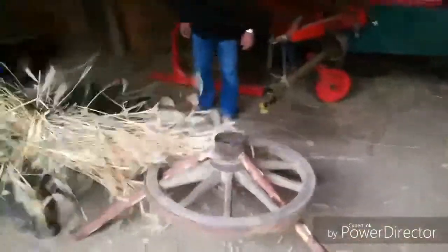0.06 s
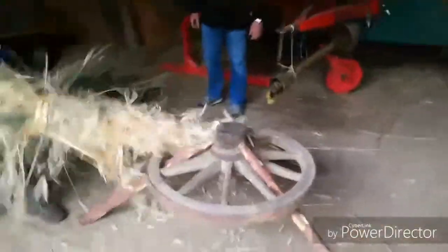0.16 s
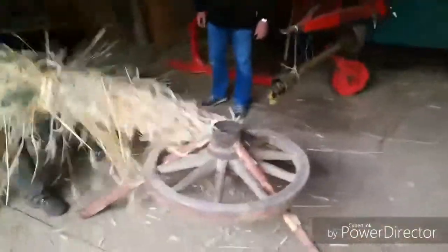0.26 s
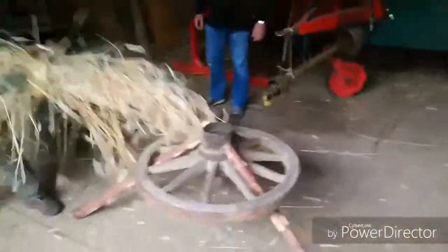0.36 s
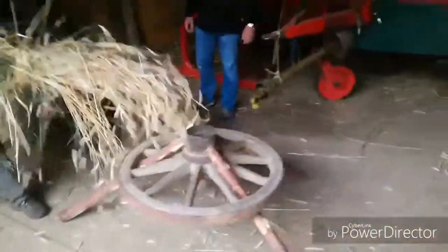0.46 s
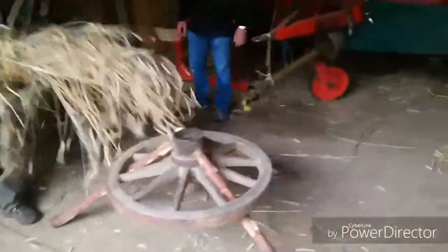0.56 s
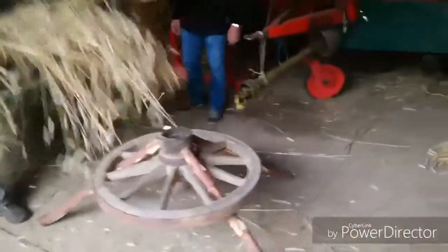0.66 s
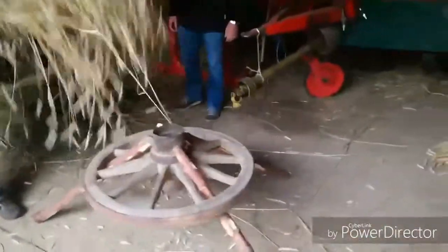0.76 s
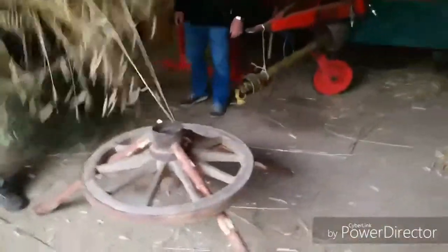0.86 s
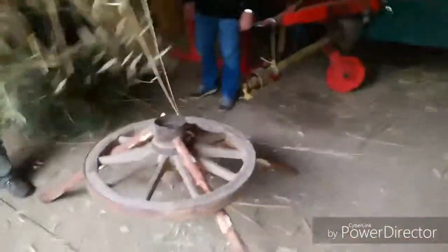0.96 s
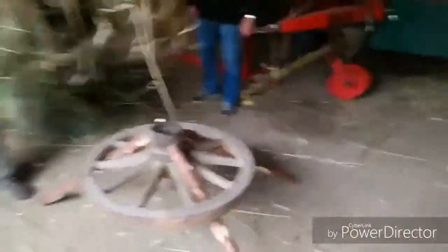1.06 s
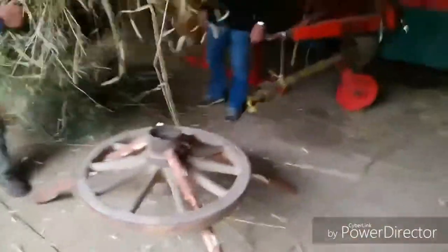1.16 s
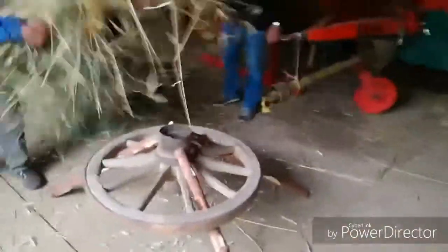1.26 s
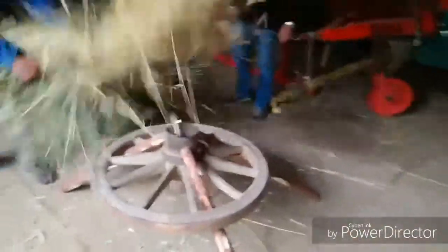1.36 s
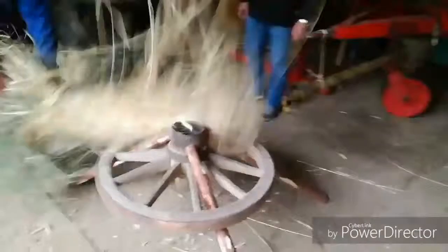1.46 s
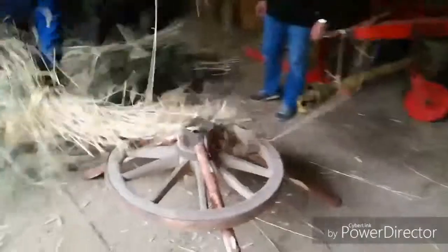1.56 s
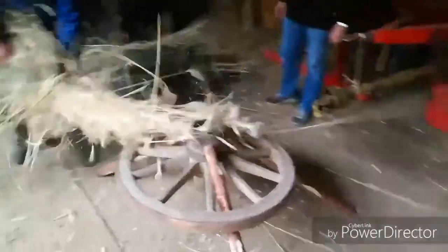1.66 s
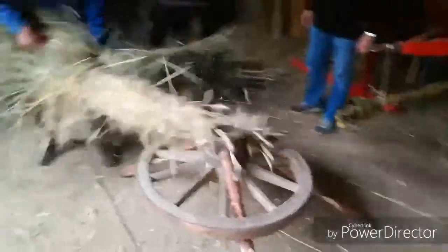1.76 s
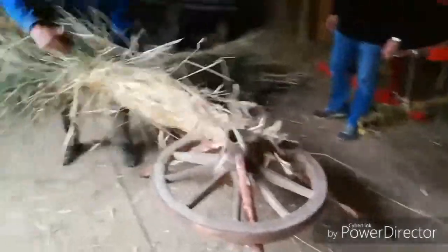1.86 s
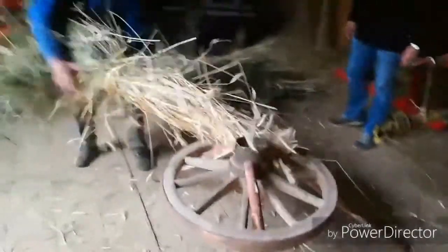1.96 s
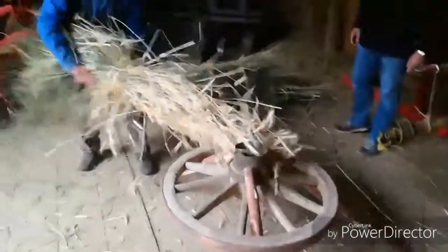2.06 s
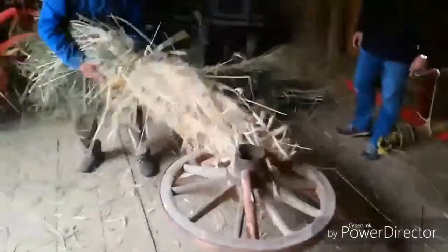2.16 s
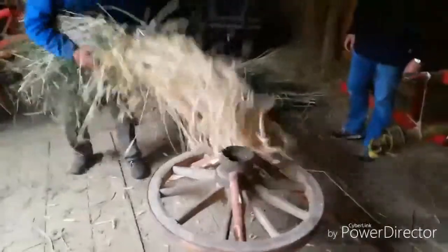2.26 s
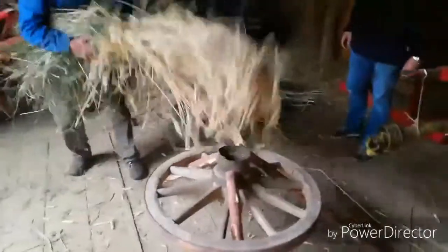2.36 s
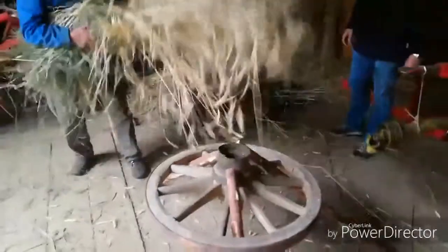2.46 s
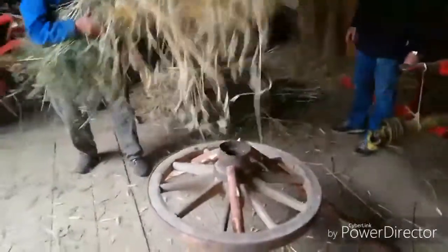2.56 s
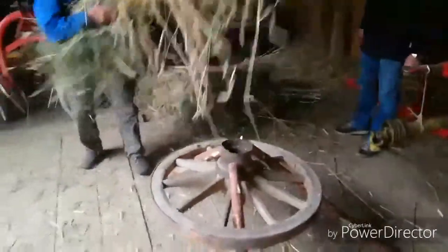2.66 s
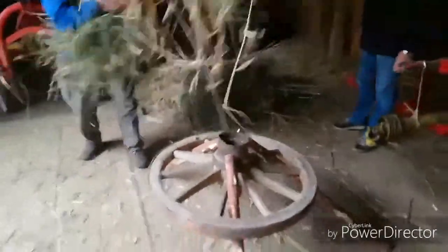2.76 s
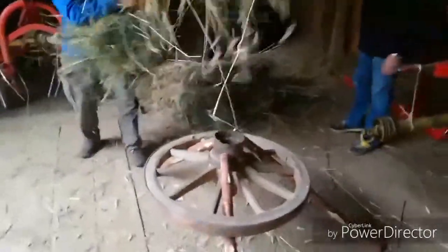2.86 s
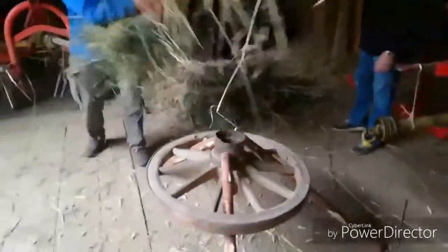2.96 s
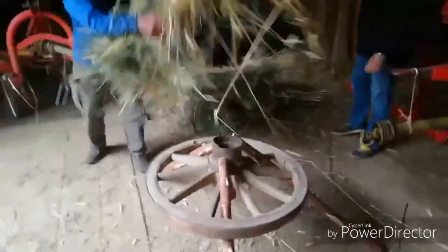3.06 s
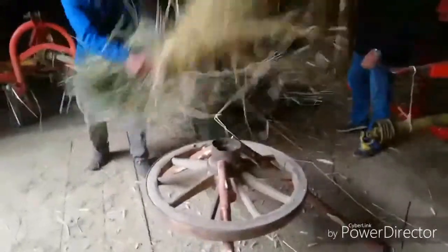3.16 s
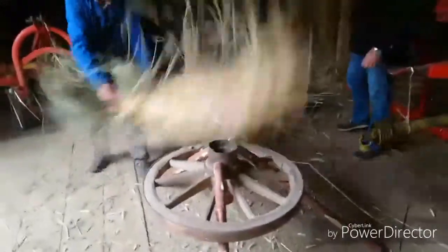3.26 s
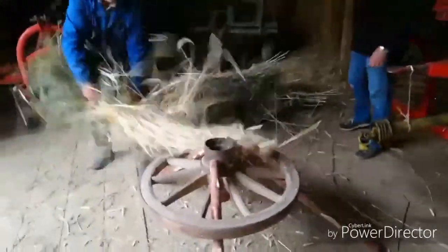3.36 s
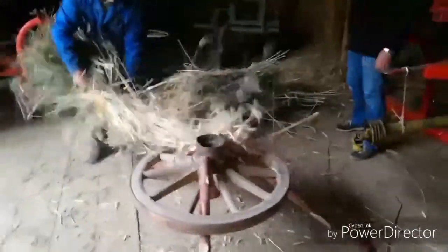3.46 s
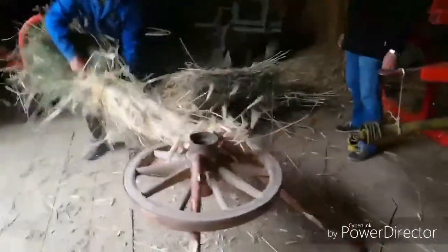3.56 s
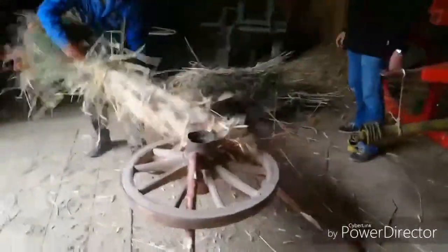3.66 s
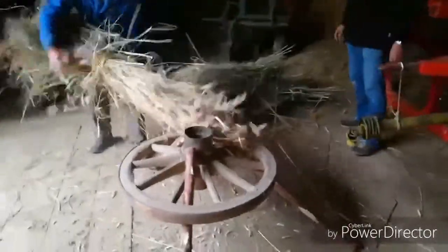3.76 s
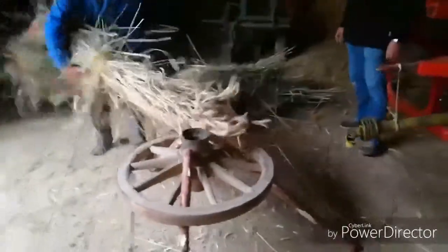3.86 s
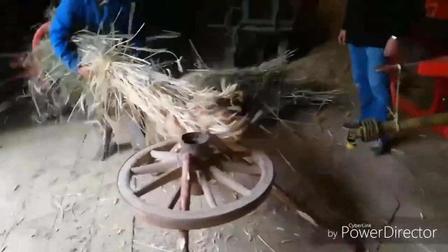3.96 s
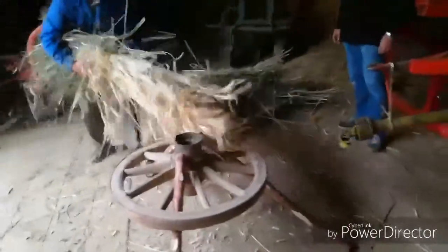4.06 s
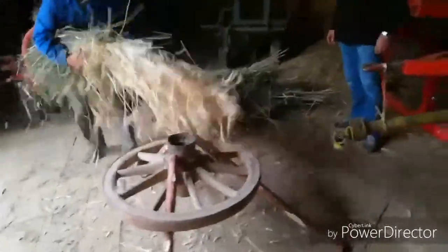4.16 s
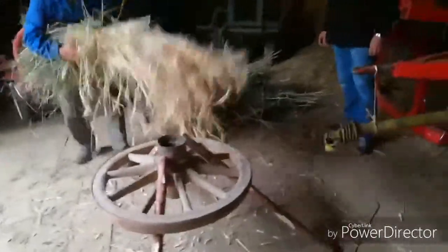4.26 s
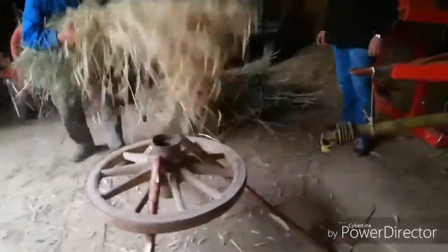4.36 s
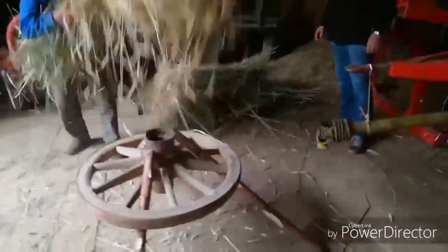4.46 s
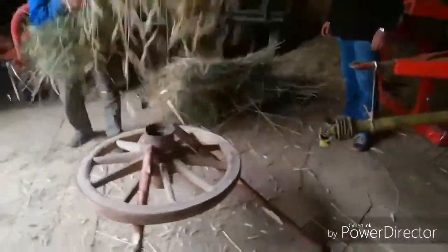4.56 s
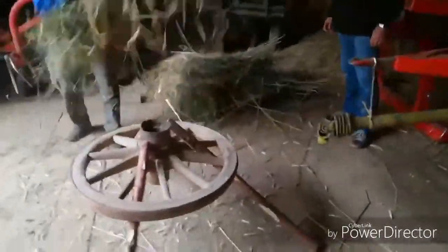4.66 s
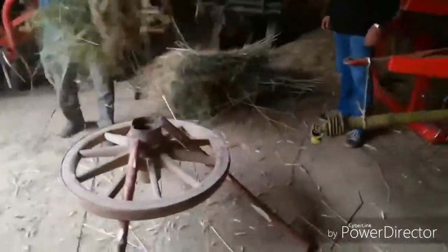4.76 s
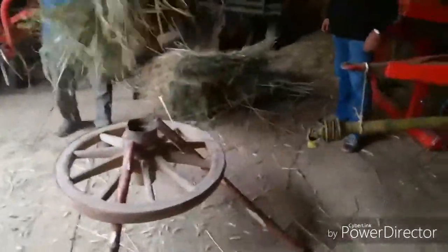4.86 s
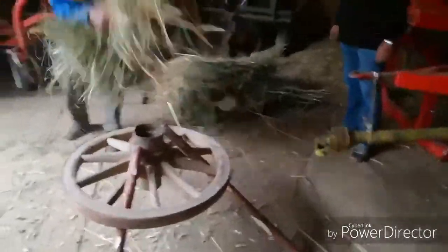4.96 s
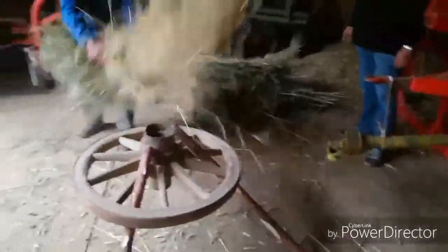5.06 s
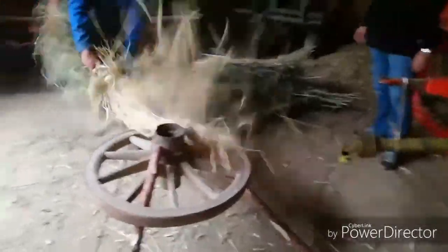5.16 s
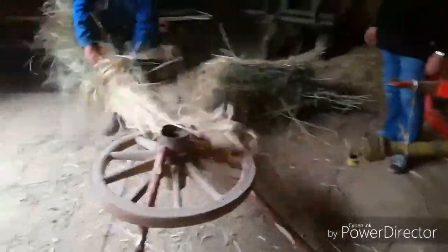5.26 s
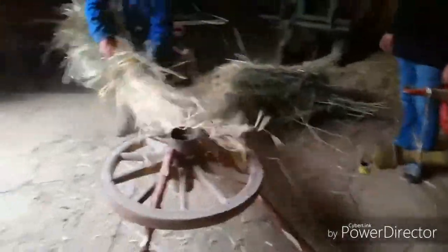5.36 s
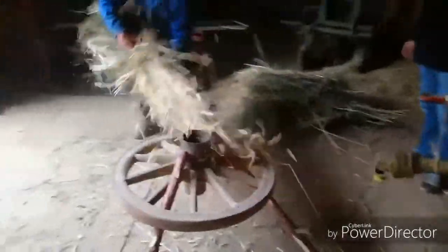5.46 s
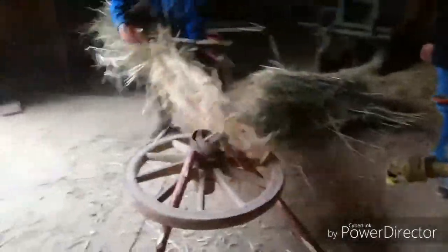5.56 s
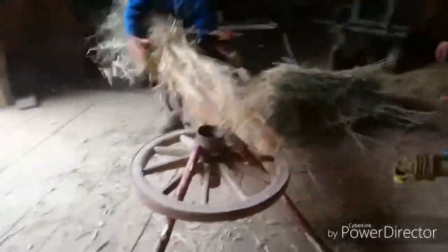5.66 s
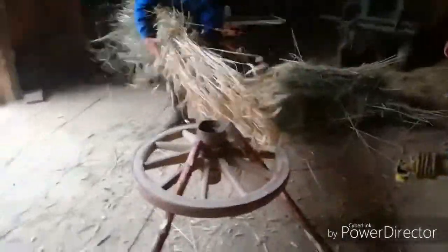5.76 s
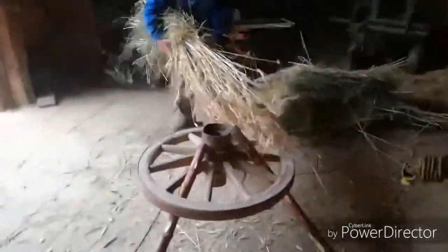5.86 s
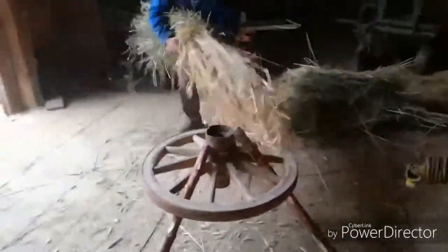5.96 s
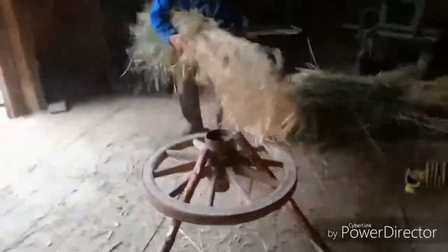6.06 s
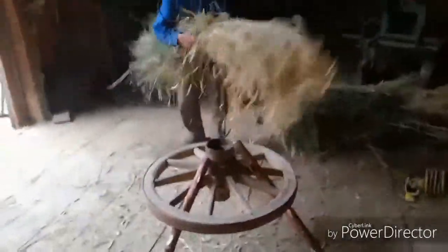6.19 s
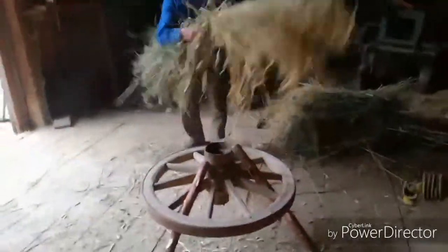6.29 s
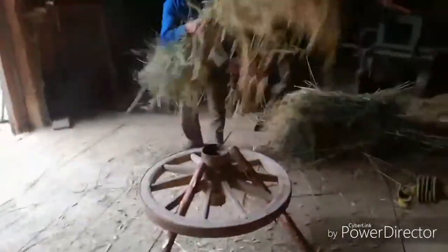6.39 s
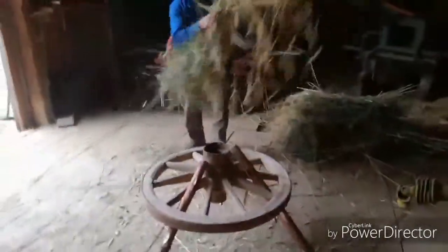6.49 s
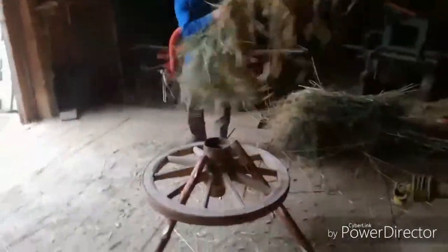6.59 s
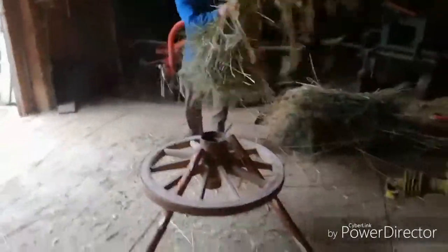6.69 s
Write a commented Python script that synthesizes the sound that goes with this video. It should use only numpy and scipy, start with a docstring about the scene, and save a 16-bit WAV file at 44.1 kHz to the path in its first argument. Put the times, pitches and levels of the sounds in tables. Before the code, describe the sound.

A bundle of straw is beaten against a wooden wheel in a slow, even rhythm: a rising swish, a sharp whack with a thud beneath it, then crackling and hissing as it is raised again. This happens three times, the last two a little sharper. Faint boot scuffs and a few small knocks come from the plank floor. The barn adds a short echo, and light puffs of air reach the microphone.

```python
"""A sheaf of straw is swung down three times onto a wooden cart wheel in a barn.
Each blow is a cloud of stalks slapping the wheel, with a thud and a brief ring. Between blows the
sheaf is shaken and lifted: its ears hiss and its stalks crunch. Boots shuffle and knock on the plank
floor, boards and hay throw back echoes, and air and footfalls rumble a little."""
import sys
import numpy as np
from scipy import signal
from scipy.fft import rfft, irfft, next_fast_len
from scipy.io import wavfile
from scipy.ndimage import uniform_filter1d

SR = 44100
rng = np.random.default_rng(int(sys.argv[2]) if len(sys.argv) > 2 else 0)


def generate_wav(sig):
    """Save sig (samples, or channels by samples) to the path in sys.argv[1] as 16-bit PCM at SR."""
    pcm = np.round(np.clip(np.atleast_2d(sig).T, -1, 1) * 32767).astype(np.int16)
    wavfile.write(sys.argv[1], SR, pcm)


N = 296793
TIME = np.arange(N) / SR

# The blows on the wheel: (time of full contact [s], slap strength [dB], rise [s], fall [s],
# thud [dB], ring [dB], treble tilt [dB per octave], puff of air on the microphone [dB])
SHEAF_BLOWS = [(1.492, -24.5, 0.014, 0.042, -38, -46, 0, -65),
               (3.341, -20, 0.011, 0.023, -36.5, -44, 0, -53.5),
               (5.178, -21, 0.006, 0.022, -40, -38, 0.62, -51)]


def amp(db):
    """Turns decibels into a number to multiply by."""
    return 10 ** (np.asarray(db) / 20)


def unit(x):
    """Scales a signal to an average strength (rms) of 1."""
    return x / np.sqrt(np.mean(x ** 2) + 1e-20)


def read(points, hz):
    """Looks up a (frequency, value) table, blending between its rows along the octaves."""
    f, value = np.transpose(points)
    return np.interp(np.log(hz + 1), np.log(f + 1), value)


def shape(x, gain):
    """Turns each frequency of x up or down by gain(hz)."""
    size = next_fast_len(x.shape[-1] + 2048, True)
    return irfft(rfft(x, size) * gain(np.fft.rfftfreq(size, 1 / SR)), size)[..., :x.shape[-1]]


def colour(x, points, tilt_db=0):
    """Gives x the tone in a table, tilted by tilt_db per octave, at strength 1."""
    return unit(shape(x, lambda hz: amp(read(points, hz) + tilt_db * np.log2(hz + 1))))


def add(mix, s, sound):
    """Mixes a sound in, starting at s seconds."""
    part = mix[:, max(round(s * SR), 0):][:, :sound.shape[-1]]
    part += sound[..., :part.shape[1]]


def swell(s, half_length):
    """A smooth rise and fall around s seconds."""
    return np.exp(-((TIME - s) / half_length) ** 2)


def contact(t, rise, fall):
    """How many stalks are landing: more and more as the sheaf meets the wheel at t = 0, then fewer."""
    return 1 / np.sqrt(np.exp(np.minimum(-2 * t / rise, 80)) + np.exp(np.minimum(2 * t / fall, 80)))


def low_air():
    """Air pushed by each blow and footfalls rumble a little; a faint hum dies away."""
    # Soft low bumps, mostly from footfalls: (time [s], half length [s], level [dB])
    soft_bumps = [(0.2, 0.036, -58), (0.34, 0.1, -61.5), (0.807, 0.4, -67), (1.68, 0.17, -56),
                  (1.878, 0.037, -52.5), (2.814, 0.07, -64), (4.041, .045, -50.5), (4.748, 0.057, -65),
                  (5.64, 0.054, -62)]
    # Tone of the rumble: (frequency [Hz], level [dB])
    rumble_tone = [(12, -2), (25, 2), (55, -2), (90, -8.5), (160, -19.5), (400, -22.5), (1500, -51)]
    # Fading of the hum: (time [s], level [dB])
    hum_fade = [(0, -67), (.7, -65.5), (1.1, -68.5), (1.4, -88), (1.7, -100)]
    still_air_db, hum_hz = -87.5, 72
    puffs = [amp(db) * contact(TIME - s, rise=0.0078, fall=0.17) for s, *_, db in SHEAF_BLOWS]
    bumps = [amp(db) * swell(s, half_length) for s, half_length, db in soft_bumps]
    push = np.hypot(amp(still_air_db), np.linalg.norm(puffs + bumps, axis=0))
    rumble = colour(rng.standard_normal(N), rumble_tone) * push
    hum = amp(np.interp(TIME, *np.transpose(hum_fade))) * np.sin(2 * np.pi * hum_hz * TIME)
    return rumble + hum


def microphone_openings(x):
    """The left and right openings share the bass and a few higher bands; each has its own tone."""
    # How alike the sides are: (frequency [Hz], likeness [0 = unrelated, 1 or more = the same])
    likeness = [(120, 1.5), (320, 0.67), (520, 0), (760, 0.1), (1150, 0.68), (1500, 0.54), (2000, 0),
                (2500, -0.16), (3500, 0), (7700, 0), (8850, 0.3), (9900, 0.11), (16000, -0.04)]
    # Which side is louder: (frequency [Hz], left minus right [dB])
    balance = [(60, 1), (110, 0.0), (200, 1.5), (380, 0), (700, -2), (1290, 3.5), (2380, 2), (4400, -4.5),
               (8120, 0), (15000, 1.5)]

    def blend(hz):
        return np.arcsin(np.clip(read(likeness, hz), -1, 1)) / 2
    left, right = shape(x, lambda hz: np.cos(blend(hz))) + shape(x[::-1], lambda hz: np.sin(blend(hz)))
    return np.array([shape(left, lambda hz: amp(read(balance, hz) / 2)),
                     shape(right, lambda hz: amp(-read(balance, hz) / 2))])


def barn(x):
    """Boards and hay scatter the sound into echoes; the treble dies first."""
    # How long the echoes last: (frequency [Hz], time to fade by 60 dB [s])
    echo_times = [(100, 0.82), (500, 0.71), (2000, 0.4), (6000, 0.4), (15000, 0.29)]
    echoes_per_s, gap_s = 2500, .005
    echoes = rng.standard_normal((2, SR)) * (rng.random((2, SR)) < echoes_per_s / SR)
    echoes *= np.arange(SR) / SR > gap_s
    hz, t, bands = signal.stft(echoes, SR, nperseg=256)
    tail = signal.istft(bands * amp(-60 * t / read(echo_times, hz)[:, None]), SR, nperseg=256)[1]
    return signal.fftconvolve(x, tail / np.linalg.norm(tail, axis=1, keepdims=True), axes=1)[:, :N]


def boots():
    """Soles rub the planks into short groans; heels, stalks and wood knock."""
    # Boots shifting: (middle [s], level [dB], half length [s], board pitch [Hz], pitch spread [Hz])
    shuffles = [(0.03, -63.5, 0.03, 155, 90), (0.31, -77, 0.082, 160, 160), (1.819, -62, 0.24, 126, 160),
                (2.07, -65, .17, 259, 200), (2.333, -57, .14, 234, 346), (2.718, -61.5, 0.053, 128, 100),
                (2.818, -58.5, 0.1, 150, 170), (3.495, -52, 0.046, 312, 70), (3.62, -64.5, 0.093, 170, 140),
                (4.041, -58, 0.094, 222, 292), (4.398, -72, 0.052, 297, 140), (4.776, -57, 0.051, 91.6, 60),
                (4.785, -53.5, 0.074, 303, 35.2), (4.943, -67, 0.037, 248, 60),
                (6.082, -61, 0.065, 320, 130), (6.174, -72, 0.061, 219, 120), (6.35, -72.5, .08, 201, 140)]
    # Short knocks: (time [s], level [dB], pitch [Hz], time to fade by 60 dB [s], dry clack [0 to 1])
    knocks = [(1.916, -34.5, 1080, 0.027, .8), (5.355, -36, 230, 0.065, 0.7), (5.634, -34, 104, 0.07, 0.2)]
    out, t = np.zeros((2, N)), np.arange(SR // 2) / SR
    for s, db, half_length, hz, width in shuffles:
        pressure = signal.windows.hann(int(2 * half_length * SR))
        noise = rng.standard_normal((2, SR))[:, :len(pressure)]
        rub = shape(noise, lambda f: 1 / (1 + (2 * (f - hz) / width) ** 2))
        add(out, s - half_length, amp(db) * unit(rub * pressure) * np.sqrt(np.mean(pressure ** 2)))
    for s, db, hz, fade_s, clack in knocks:
        grit_tone = [(hz / 4, -20), (hz / 2, -7), (hz, 0), (2 * hz, -6), (5 * hz, -35)]
        grit = colour(rng.standard_normal((2, len(t))), grit_tone)
        loudness = amp(db - 60 * t / fade_s) * (1 - np.exp(-t * hz * 2))
        add(out, s, loudness * ((1 - clack) * np.sin(2 * np.pi * hz * t) + clack * grit))
    return out


def crackle(size, per_s, spread_db, snap_s, kinds=11):
    """Countless tiny snaps of straw, a few large; each kind reaches left and right by its own paths."""
    happens = rng.random(size) < per_s / SR
    strength = np.minimum(rng.exponential(1, size), 4.5)
    snaps = happens * amp(spread_db * strength) * rng.choice([-1, 1], size)
    kind = rng.integers(0, kinds, size)
    out, t = np.zeros((2, size)), np.arange(256) / SR
    for k, hz in enumerate(np.geomspace(1500, 14000, kinds)):  # thick stalks snap lower
        burst = rng.standard_normal((2, len(t))) * np.exp(-t / snap_s)
        burst = unit(shape(burst, lambda f: .5 + np.exp(-np.log2((f + 1) / hz) ** 2)))
        out += signal.oaconvolve((snaps * (kind == k))[None], burst, axes=1)[:, :size]
    # Even out the tone, so that all frequencies are equally strong overall.
    hz, power = signal.welch(out, SR, nperseg=256)
    return unit(np.array([shape(x, lambda f: np.interp(f, hz, p) ** -.5) for x, p in zip(out, power)]))


def tufts(x, patchy_db):
    """Tufts of straw catch and let go, each briefly lifting its own range of pitches."""
    bands = signal.stft(x, nperseg=512)[2]
    patches = uniform_filter1d(rng.standard_normal(bands.shape[1:]), size=18, axis=0)  # across pitch
    patches = uniform_filter1d(patches, size=5, axis=1)  # across time
    return unit(signal.istft(bands * amp(patchy_db * unit(patches)), nperseg=512)[1][:, :x.shape[1]])


def handling():
    """How loud the hiss and crunch are as the straw settles, is lifted and speeds down again."""
    # The sheaf after each landing: (hiss on the wheel [dB], time lying there [s],
    # hiss in the air [dB], crunch compared with hiss [dB])
    strokes = [(-40.5, 1.11, -50.5, -16), (-38.5, 1.066, -46, -13), (-41, 0.84, -49, -12.5),
               (-43.5, 1.006, -50.5, -13)]
    settle_db_per_s, lift_s, lifted_crunch_db = 5, 0.091, -1  # stalks bend less off the wheel
    swing_db, swing_db_per_s = -38.5, 56.5
    landings = [-0.36] + [row[0] for row in SHEAF_BLOWS]  # the sheaf starts out lying on the wheel
    held, swing, bending = np.zeros((3, N))
    for s, (lying_db, lying_s, raised_db, crunch_db) in zip(landings, strokes):
        age = TIME - s
        lifted = np.clip((age - lying_s) / lift_s, 0, 1)
        db = (1 - lifted) * (lying_db - settle_db_per_s * age) + lifted * raised_db
        held = np.where(age >= 0, amp(db), held)
        bending = np.where(age >= 0, amp(crunch_db + lifted * lifted_crunch_db), bending)
        swing += (age < 0) * amp(swing_db - swing_db_per_s * abs(age))
    hiss = np.hypot(held, swing)
    return hiss, hiss * bending


def rustle():
    """Ears of grain hiss and stalks crunch as the sheaf is shaken and raised."""
    # Tugs and shakes: (time [s], half length [s], hiss [dB], crunch [dB])
    shakes = [(0.016, 0.077, -45.5, -57), (0.806, 0.059, -52, -61), (1.397, 0.016, -45, -57),
              (1.798, 0.061, -62, -60), (2.069, 0.094, -38.5, -51.5), (2.215, 0.053, -44.5, -51.5),
              (2.42, 0.21, -44.5, -61), (2.826, .04, -45, -57.5), (3.075, 0.091, -46.5, -57.5),
              (3.267, 0.037, -42, -56), (3.952, 0.096, -44.5, -58), (4.116, 0.042, -47.5, -54),
              (4.803, 0.17, -50.5, -59), (5.685, 0.077, -54, -59), (6.073, .06, -52, -58)]
    # Tone of the hissing ears: (frequency [Hz], level [dB])
    ear_tone = [(1000, -35), (1900, -3), (2800, -2), (3700, -4), (5200, -2.5), (7300, -1.5), (8900, -5),
                (11200, -8.5), (14600, -5.5), (15300, -9.5), (16000, -3.5)]
    # Tone of the crunching stalks: (frequency [Hz], level [dB])
    stalk_tone = [(100, -15.5), (250, -17), (480, -14.5), (750, -6), (1100, -1.5), (1600, 2), (2100, -2),
                  (2900, -13), (6000, -41)]
    slip_db, slip_s = 0.8, 0.071  # the straw slips in fits and starts
    hiss, crunch = handling()
    for s, half_length, hiss_db, crunch_db in shakes:
        tug = swell(s, half_length)
        hiss = np.hypot(hiss, amp(hiss_db) * tug)
        crunch = np.hypot(crunch, amp(crunch_db) * tug)
    ears = colour(crackle(N, per_s=12000, spread_db=2.5, snap_s=0.001), ear_tone)
    ears = tufts(ears, patchy_db=0.9)
    stalks = colour(crackle(N, per_s=7000, spread_db=3.0, snap_s=0.00064), stalk_tone)
    stalks = tufts(stalks, patchy_db=1.1)
    slips = unit(shape(rng.standard_normal(N), lambda hz: np.exp(-(hz * slip_s) ** 2)))
    return (ears * hiss + stalks * crunch) * amp(slip_db * slips)


def bounces(x, echo_db, latest_s, count=7):
    """Floor, wheel stand and nearby machines throw the slap back, making it hollow and coarse."""
    delays = rng.uniform(.002, latest_s, (2, count, 1))
    hollow = shape(x, lambda hz: 1 + amp(echo_db) * np.exp(-2j * np.pi * hz * delays).sum(1))
    return hollow / np.sqrt(1 + count * amp(echo_db) ** 2)


def blow(s, slap_db, rise, fall, thud_db, ring_db, tilt_db):
    """Stalks slap the wheel, shake it and spring back; gives the start time and the sound."""
    # Tone of the slapping stalks: (frequency [Hz], level [dB])
    slap_tone = [(200, -29), (340, -12), (490, -17), (700, -6.5), (900, -9), (1100, -5), (1400, -6),
                 (1800, -2), (2600, 0), (3100, -2.5), (5000, -4.5), (7500, -0.5), (8800, -3.5), (11300, -9),
                 (14700, -5.5), (16000, -7)]
    # Tone of the thudding wheel and its stand: (frequency [Hz], level [dB])
    thud_tone = [(40, -12), (85, -12), (150, 10.5), (240, 9), (380, 5), (500, -40), (700, 9), (1200, -27),
                 (3000, -60)]
    # Brief ringing pitches that colour each slap: (pitch [Hz], level [dB], time to fade by 60 dB [s])
    ring_pitches = [(732, -8, 0.11), (1103, 14, 0.23), (1476, -18, 0.12), (1516, -7, 0.15), (2030, -1, .13),
                    (2190, -12, 0.11), (2710, -13, .1), (2700, 3, 0.14), (3170, -5, .1), (3820, 13, 0.12),
                    (5360, 18, .1), (6840, -31, .1), (6760, -24, 0.086), (7100, 4, 0.15), (9100, 3, .1)]
    lead_s = .15  # room for the sound to build before full contact
    t = np.arange(SR) / SR
    landing = contact(t - lead_s, rise, fall)
    rebound = amp(-15.5) * contact(t - lead_s - .04, rise=0.047, fall=0.093)
    snaps = crackle(SR, per_s=18000, spread_db=2.0, snap_s=0.00091)
    snaps = bounces(snaps, echo_db=-15.5, latest_s=.008)
    slaps = colour(snaps, slap_tone, tilt_db) * (landing + rebound)
    ring = sum(amp(db - 60 * t / fade_s) * np.sin(2 * np.pi * hz * t) for hz, db, fade_s in ring_pitches)
    ringing = unit(signal.fftconvolve(slaps, ring[None], axes=1)[:, :SR]) * slaps.std()
    thud = colour(rng.standard_normal((2, SR)), thud_tone)
    thud *= contact(t - lead_s - .002, rise=0.0082, fall=0.032)
    return s - lead_s, amp(slap_db + 5.0) * slaps + amp(ring_db) * ringing + amp(thud_db) * thud


def scene():
    """Blows, rustle and boots echo in the barn, over the low rumble of air."""
    beating = np.zeros((2, N))
    for *strike, _ in SHEAF_BLOWS:
        add(beating, *blow(*strike))
    straw, steps = rustle(), boots()
    echoes = barn(amp(-12.5) * beating + amp(-5) * straw + amp(-13.0) * steps)
    return microphone_openings(beating + straw + steps + echoes) + low_air()


def record(dry):
    """Turns down one narrow band of treble and cuts off the very highest sounds."""
    dip_db, dip_hz, dip_width_hz, top_hz = -12, 8070, 190, 15850
    dipped = shape(dry, lambda hz: amp(dip_db * np.exp(-((hz - dip_hz) / dip_width_hz) ** 2)))
    treble_cut = signal.firwin(511, top_hz, window=("kaiser", 9), fs=SR)
    return signal.oaconvolve(dipped, treble_cut[None], "same")


dry = scene()
out = record(dry)
generate_wav(out)
```